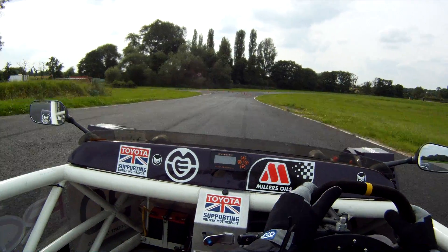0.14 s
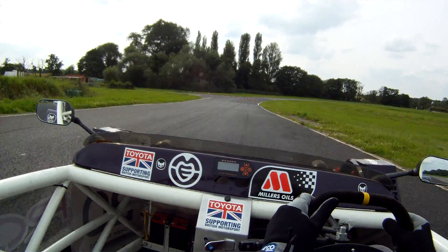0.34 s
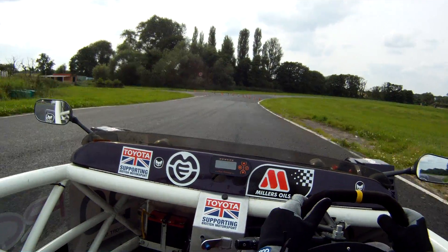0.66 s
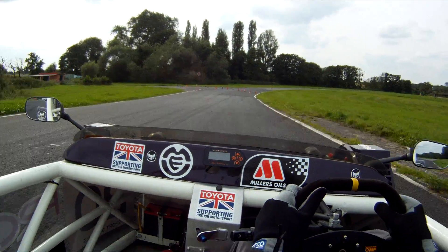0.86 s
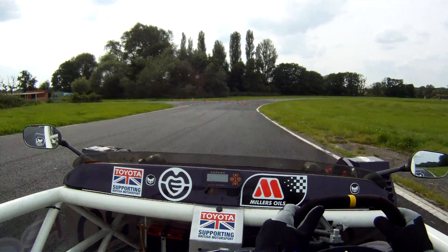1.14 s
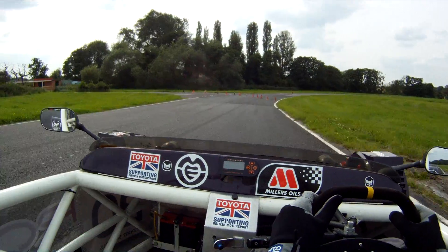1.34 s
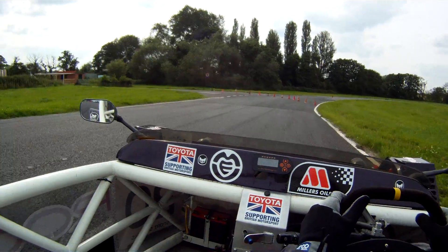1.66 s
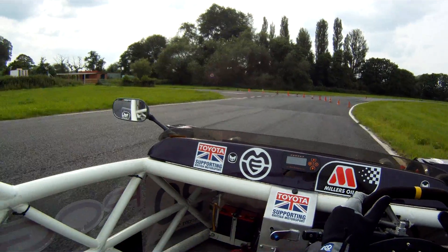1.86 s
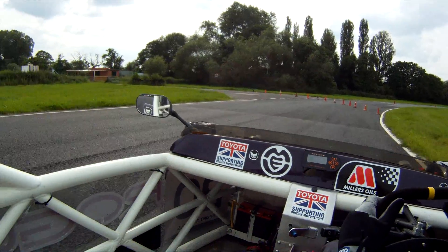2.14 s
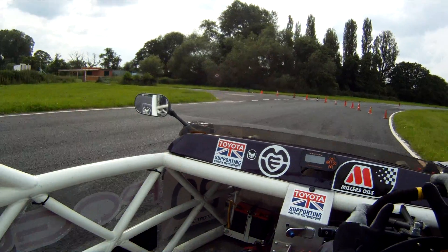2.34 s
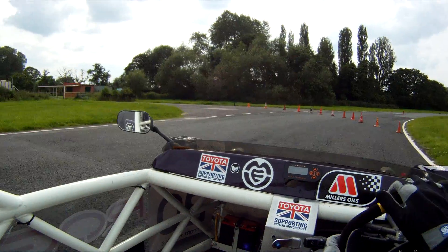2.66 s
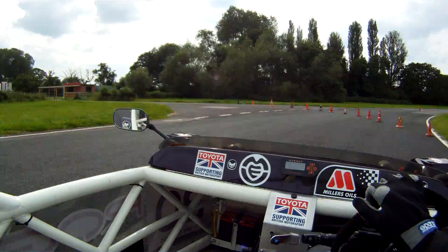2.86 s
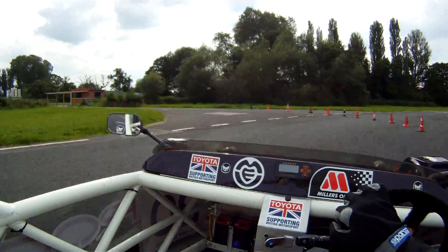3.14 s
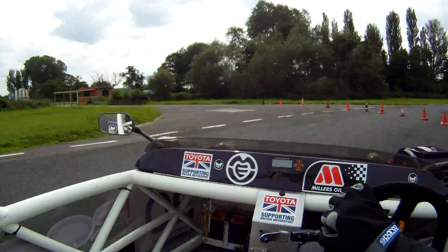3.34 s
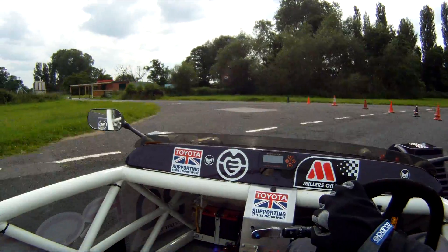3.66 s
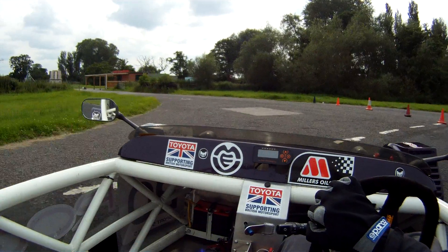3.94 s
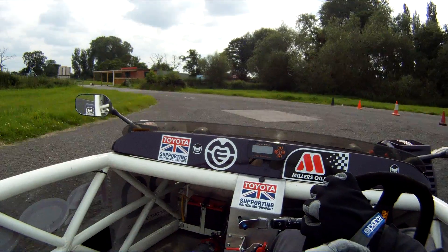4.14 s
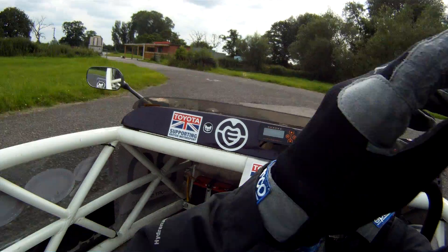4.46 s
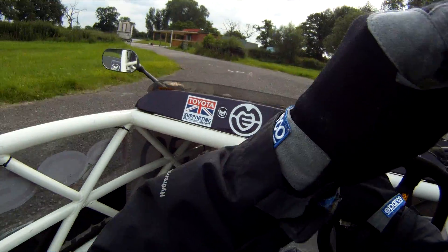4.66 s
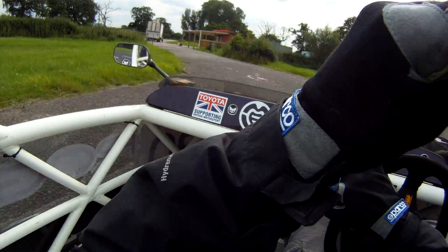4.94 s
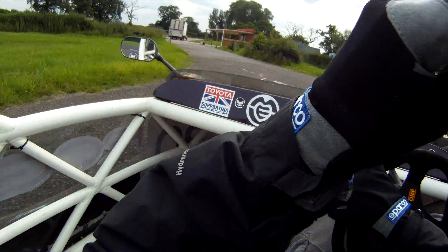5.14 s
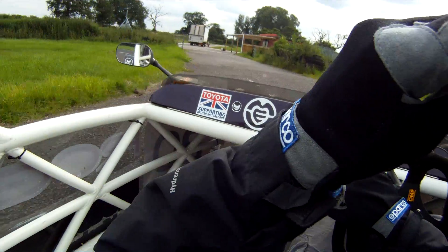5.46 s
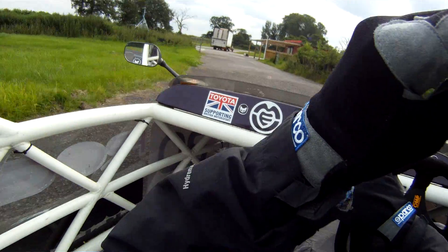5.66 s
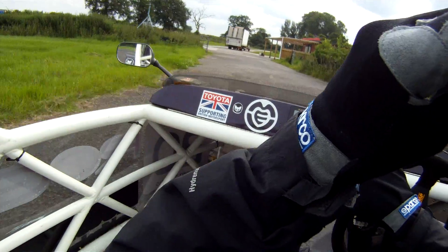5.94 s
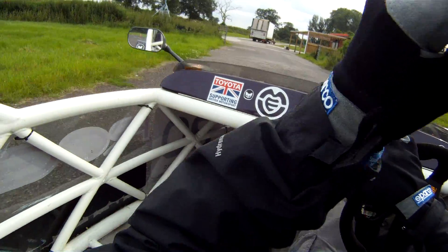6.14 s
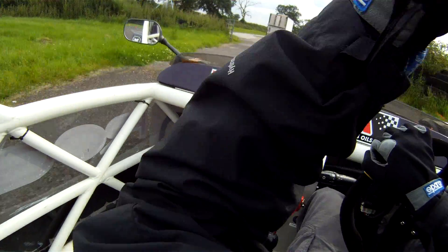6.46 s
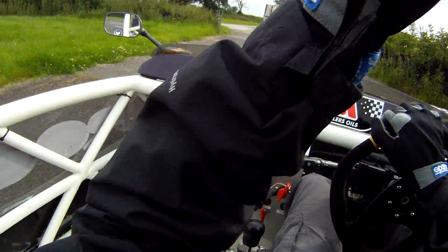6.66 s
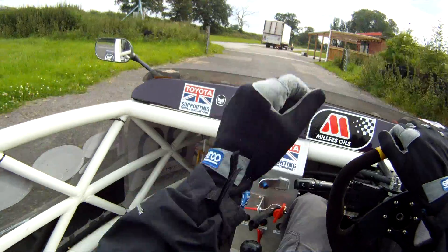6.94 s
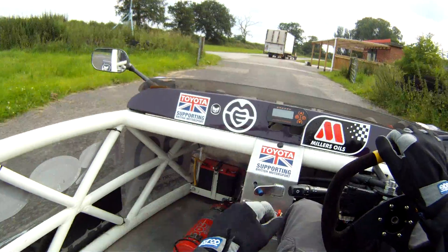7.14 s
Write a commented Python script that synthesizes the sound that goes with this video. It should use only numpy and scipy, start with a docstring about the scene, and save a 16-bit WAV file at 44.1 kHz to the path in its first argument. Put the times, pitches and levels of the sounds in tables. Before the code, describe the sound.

An open track car coasts down, its low engine hum sinking under rumble, wind and rattles, then the brakes squeal in pulses.

```python
"""An open track car coasts down from speed, heard inside a closed camera housing on its frame.
From the start, engine orders glide down through a frame resonance, the mount shakes on its modes,
tyre and wind noise fill the housing and loose parts rattle. As the rush fades, a dull thump comes
through the frame, and from about 3 s a brake squeals once a wheel turn. At 6 s one sharp tap rings
the shell; two more thumps follow, and the rush swells briefly at the end."""
import sys
import numpy as np
from scipy import signal
from scipy.fft import rfft, irfft
from scipy.io import wavfile

SR = 44100
rng = np.random.default_rng(int(sys.argv[2]) if len(sys.argv) > 2 else 0)


def pcm_store(signal):
    """Save signal as 16-bit PCM."""
    levels = np.round(np.clip(np.atleast_2d(signal), -1, 1) * 32767)
    wavfile.write(sys.argv[1], SR, levels.astype(np.int16).T)


N = 322371


def amp(db):
    """Amplitude ratio of a level in decibels."""
    return 10 ** (np.asarray(db) / 20)


def unit_rms(x):
    """Normalisation to unit power."""
    return x / np.sqrt(np.mean(x ** 2) + 1e-20)


def curves(rows):
    """Linear interpolation in time: one curve for each column after the first."""
    times, *columns = np.transpose(rows)
    return [np.interp(np.arange(N) / SR, times, column) for column in columns]


def level_at(spectrum, hz):
    """Interpolation of a spectrum on a log-frequency axis."""
    points_hz, levels_db = np.transpose(spectrum)
    return np.interp(np.log(hz), np.log(points_hz), levels_db)


def drift(rate_hz):
    """Random modulation: low-passed noise of unit rms."""
    pole = np.exp(-2 * np.pi * rate_hz * 20 / SR)   # one step every 20 samples
    white = rng.standard_normal(N // 20 + 2002)
    slow = signal.lfilter([1], [1, -2 * pole, pole * pole], white)[2000:]
    return np.interp(np.arange(N) / 20, np.arange(len(slow)), unit_rms(slow))


def ring(force, hz, t60_s):
    """Damped oscillator: a unit impulse starts a decaying sine of height 1."""
    r, w = amp(-60 / (t60_s * SR)), 2 * np.pi * hz / SR
    return signal.lfilter([0, np.sin(w)], [1, -2 * r * np.cos(w), r * r], force + 1e-18)


def sine(hz):
    """Sine of unit rms whose phase is the integral of frequency."""
    cycles = np.cumsum(hz * np.ones(N)) / SR
    return np.sqrt(2) * np.sin(2 * np.pi * (cycles + rng.random()))


def coloured(white, spectrum):
    """Spectral shaping of white noise, to unit rms."""
    hz = np.maximum(np.fft.rfftfreq(N, 1 / SR), 1)
    return unit_rms(irfft(rfft(white) * amp(level_at(spectrum, hz)), N))


def band_noise(low_hz, high_hz):
    """Band-limited noise of unit rms."""
    band = signal.butter(2, [low_hz, high_hz], "band", fs=SR, output="sos")
    return unit_rms(signal.sosfilt(band, rng.standard_normal(N)))


def driven_modes(modes):
    """Resonators under random forcing: decay time is inverse to bandwidth."""
    return sum(amp(db) * unit_rms(ring(rng.standard_normal(N), hz, np.log(1000) / (np.pi * width_hz)))
               for hz, width_hz, db in modes)


def swell_power(middles_s, lengths_s, levels_db, rise_s, fall_s):
    """Incoherent addition: plateaus with Gaussian edges sum in power."""
    t, power = np.arange(N) / SR, np.zeros(N)
    for middle, length, db in zip(middles_s, lengths_s, levels_db):
        near = slice(max(round((middle - .4) * SR), 0), round((middle + .4) * SR))
        early = np.maximum(middle - length / 2 - t[near], 0)
        late = np.maximum(t[near] - middle - length / 2, 0)
        power[near] += amp(db) ** 2 * np.exp(-2 * (early / rise_s) ** 2 - 2 * (late / fall_s) ** 2)
    return power


# Coasting engine: time_s, firing_hz, load_db, upper_orders_db
ENGINE_COAST = [(0, 112.9, -28, -12), (.5, 104, -29, -14), (1.3, 90.6, -31.5, -13), (1.8, 82, -32.5, -5.5),
                (2.2, 77.2, -35, 1), (2.6, 71.4, -36.5, 2.5), (3.1, 64, -36, -0.2), (3.8, 55, -42, -0.8),
                (4.3, 50.2, -37.5, -2.2), (4.8, 45.85, -43, -1), (5.6, 43.06, -46, 0.5),
                (6.4, 41.3, -47, 1.5), (7.31, 39.26, -51, 5)]
# Engine orders 1 to 4: gain_db
ORDER_GAINS = [3.5, 0, -4.5, 0]
# Transmission from frame to housing: frequency_hz, gain_db
FRAME_RESPONSE = [(45, -32), (60, -35), (72, -2.5), (100, 0.5), (135, -1), (160, -10.5), (172, -17),
                  (190, -19.5), (230, -37), (460, -29)]


def engine():
    """Forced vibration: each harmonic of the firing rate is loud only in the frame's pass band."""
    firing_hz, load_db, upper_db = curves(ENGINE_COAST)
    firing_hz = firing_hz * (1 + 0.0042 * drift(9.1))
    out = 0
    for k, order_db in enumerate(ORDER_GAINS):
        hz = (k + 1) * firing_hz
        drive_db = load_db + order_db + (k > 0) * upper_db
        waver_db = (0.5 + 0.92 * k) * drift(12.3)   # higher orders waver more
        out += amp(drive_db + level_at(FRAME_RESPONSE, hz) + waver_db) * sine(hz)
    return out


# Low mode of the mount: time_s, pitch_hz
MOUNT_PITCH = [(0, 35), (1.9, 35.5), (2.2, 30), (2.7, 37), (5, 37), (6.4, 36), (7.31, 40)]
# Steady shaking of that mode: time_s, level_db
MOUNT_LEVEL = [(0, -26), (.5, -28.5), (1.2, -33.5), (2, -41.5), (3, -45), (4.2, -41), (5.2, -38),
               (6.3, -40.5), (7.31, -38.5)]
# Bumps in the road: peak_s, level_db
ROAD_BUMPS = [(.19, -24), (.55, -21), (.73, -27), (.96, -27.5), (1.06, -36), (1.32, -30), (1.49, -39),
              (1.61, -28), (1.7, -31), (1.86, -35), (2.17, -36), (2.34, -38), (2.45, -35), (2.74, -36),
              (3.24, -26.5), (3.7, -39), (3.85, -35.5), (4.61, -36.5), (4.78, -33.5), (5.52, -42),
              (5.72, -29.5), (6.16, -35.5), (6.48, -24), (6.72, -42), (6.96, -35), (7.1, -30), (7.2, -32)]


def mount_shake(jolts):
    """Base excitation: the mount swings unevenly on its low mode, and each bump swells the motion."""
    pitch_hz, steady_db = curves(MOUNT_PITCH)[0], curves(MOUNT_LEVEL)[0]
    swing = amp(drift(17)) * sine(pitch_hz * (1 + 0.072 * drift(7)))
    peak_s, bump_db = np.transpose(ROAD_BUMPS)
    bumps = swell_power(peak_s, np.zeros_like(peak_s), bump_db, rise_s=0.053, fall_s=0.043)
    envelope = np.sqrt(amp(steady_db + 1.5 * drift(5.3)) ** 2 + bumps)
    return envelope * (swing + .35 * jolts)


# Road vibration at the mount: time_s, level_db
ROAD_DRIVE = [(0, -31.5), (1, -31.5), (1.7, -41), (2.5, -39), (3.5, -42), (5, -49), (6.5, -48), (7.31, -55)]
# Higher modes of the mount: pitch_hz, bandwidth_hz, gain_db
MOUNT_MODES = [(78.6, 23, 3), (139, 39, -11.5)]


def road_hum(jolts):
    """Random excitation: the road keeps the mount's higher modes humming over a low rumble."""
    rumble = amp(-9.5) * np.roll(jolts, N // 2)   # the shift decorrelates it from the shake
    return amp(curves(ROAD_DRIVE)[0]) * (driven_modes(MOUNT_MODES) + rumble)


# Roar of the tyres: time_s, level_db
TYRE_LEVEL = [(0, -34), (.45, -43), (.56, -36), (.65, -40.5), (1.43, -43.5), (2, -49), (2.5, -49.5),
              (2.66, -45.5), (3.94, -53), (4.47, -42.5), (4.9, -45), (5.3, -51), (5.97, -48), (6.25, -47),
              (6.44, -43.5), (6.54, -51.5), (7, -49), (7.31, -44.5)]
# Its spectrum: frequency_hz, relative_density_db
TYRE_SPECTRUM = [(90, -33), (150, 1.5), (230, -0.5), (300, -1.5), (420, -3.5), (520, -3.5), (800, -29)]


def tyres():
    """Rolling contact: tyres on the surface make a dull, slightly lumpy noise."""
    envelope = amp(curves(TYRE_LEVEL)[0] + drift(21))
    return envelope * coloured(rng.standard_normal(N), TYRE_SPECTRUM)


# Wind in the housing, falling with speed: time_s, low_db, bright_db
WIND_LEVELS = [(0, -27.5, -25), (.2, -32.5, -34.5), (.7, -33.5, -32.5), (.8, -37.5, -37), (.97, -35, -33.5),
               (1.55, -38, -40), (1.8, -42, -41), (2.3, -46.5, -46.5), (2.8, -45, -44), (3.4, -47.5, -44),
               (3.65, -49.5, -48.5), (4.27, -46.5, -45), (4.7, -47.5, -43), (5.6, -52, -52),
               (6.0, -47, -43), (6.5, -51, -50), (6.93, -45.5, -43), (7.13, -47.5, -45), (7.31, -41.5, -34)]
# Rustles, short swells of the wind: middle_s, length_s, low_db, bright_db
WIND_RUSTLES = [(.15, 0.076, -39, -34), (1.558, 0.01, -38.5, -39), (1.647, 0.0073, -51, -50),
                (2.305, 0.027, -42.5, -42.5), (2.406, 0.02, -59, -43.5), (2.498, 0.014, -56, -48),
                (3.432, 0.023, -47, -60), (4.512, 0.28, -45, -39.5), (4.727, 0.037, -48.5, -55),
                (4.894, 0.12, -43.5, -42.5), (5.1, 0.045, -47, -42.5), (5.22, 0.036, -49.5, -44.5),
                (5.326, .03, -52, -43), (5.45, .15, -48.5, -47.5), (6.084, .05, -41.5, -36.5),
                (6.16, .03, -43, -37.5), (6.27, 0.097, -40.5, -43), (6.36, 0.066, -44.5, -52),
                (6.39, 0.036, -36, -40), (6.424, 0.0099, -32, -46), (7.254, .08, -43.5, -46)]
# Spectra of the low range and of the bright range, fast and slow: frequency_hz, relative_density_db
LOW_SPECTRUM = [(300, -32), (480, -15), (610, -7), (700, -7), (770, -4.5), (860, -6), (925, -1), (990, -11),
                (1080, -15), (1500, -16.5), (1950, -16.5), (3300, -68)]
FAST_SPECTRUM = [(650, -55), (1100, -32), (1210, -9), (1880, -10.5), (2380, 2), (2490, 0), (3050, -2),
                 (3320, -14.5), (3710, -6.5), (4150, -21), (5200, -19), (5900, -46), (7670, -67),
                 (13000, -120)]
SLOW_SPECTRUM = [(900, -40), (1100, -21), (1220, -6.5), (1340, -21.5), (1640, -11), (1900, -23.5),
                 (2110, -6), (2210, -1), (2380, 1), (2430, -13.5), (2540, -6.5), (2620, -6), (2800, -10),
                 (3290, -17.5), (3700, -16.5), (4200, -20), (5300, -22), (5900, -42), (7670, -67)]
# Crossfade to the slow spectrum: time_s, power_fraction
SLOW_SHARE = [(0, 0.04), (1.8, 0.45), (3, 0.9), (4, 1), (7.31, 1)]


def wind():
    """Flow noise filtered by housing resonances: two ranges share gusts, and each also flutters alone."""
    middle_s, length_s, *rustle_db = np.transpose(WIND_RUSTLES)
    rustles = [swell_power(middle_s, length_s, db, rise_s=0.018, fall_s=0.019) for db in rustle_db]
    buffet_db = 0.82 * drift(15.4)
    low_gain, bright_gain = [np.sqrt(amp(steady_db + buffet_db) ** 2 + power)
                             for steady_db, power in zip(curves(WIND_LEVELS), rustles)]
    gust = drift(50)
    low_gain *= amp(1.3 * gust + drift(65))
    bright_gain *= amp(1.74 * gust + 0.72 * drift(130))
    low = coloured(rng.standard_normal(N), LOW_SPECTRUM)
    white = rng.standard_normal(N)
    share = np.clip(curves(SLOW_SHARE)[0], 0, 1)
    fast = np.sqrt(1 - share) * coloured(white, FAST_SPECTRUM)
    slow = np.sqrt(share) * coloured(white[::-1], SLOW_SPECTRUM)
    return low_gain * low + bright_gain * (fast + slow)


# Knocks of loose parts: start_s, body_db, crackle_db
RATTLE_HITS = [(0.0675, -24, -39), (0.088, -16, -37), (0.131, -19, -40), (0.142, -21, -42),
               (0.2353, -17, -41), (0.284, -16, -36), (0.3257, -18.5, -42), (0.366, -18.5, -41),
               (0.4804, -31, -38), (0.556, -17.5, -41), (0.9014, -27, -46), (0.934, -26, -42),
               (1.011, -26, -53), (1.1278, -19, -43), (1.435, -22.5, -48), (1.6445, -23.5, -54),
               (1.929, -25, -57), (2.058, -27.5, -52), (2.32, -35, -54), (2.5995, -38, -52),
               (3.3184, -34, -48), (3.5794, -43, -40), (3.8776, -30, -52), (4.122, -28, -42),
               (4.358, -32, -46), (4.449, -32, -38), (4.5145, -28, -34), (4.58, -37, -42),
               (4.635, -32, -44), (4.7103, -33, -46), (4.7624, -38, -45), (5.5862, -46, -50),
               (5.7897, -32, -46), (6.0611, -28, -39), (6.1529, -28.5, -53), (6.2123, -36, -43),
               (6.278, -30, -44), (6.513, -37, -42), (6.5645, -33.5, -41.5), (6.7435, -31.5, -50),
               (6.8875, -33, -43), (6.98, -29, -38)]
# Response of the housing body: frequency_hz, relative_density_db
BODY_SPECTRUM = [(500, -20), (900, -15), (1100, -18), (1600, -3.5), (2400, 7), (3000, 6.5), (3400, -7),
                 (4500, -20), (9000, -60)]


def rattles(body_t60_s=.046, body_rise_s=0.0027, crackle_rise_s=.002):
    """Impact noise with exponential decay: the body dies quickly, the thin crackle lasts longer."""
    t = np.arange(SR // 5) / SR
    decay = amp(-60 * t / body_t60_s)
    body, crackle = np.zeros((2, N + SR))
    for start_s, body_db, crackle_db in RATTLE_HITS:
        start = round(start_s * SR)
        burst = slice(start, start + len(t))
        body[burst] += amp(body_db) * decay * (1 - np.exp(-t / body_rise_s))
        crackle[burst] += amp(crackle_db) * decay ** 0.61 * (1 - np.exp(-t / crackle_rise_s))
    thin = band_noise(3200, 5500)
    return body[:N] * coloured(rng.standard_normal(N), BODY_SPECTRUM) + crackle[:N] * thin


# Thumps through the frame: start_s, level_db, pitch_hz, t60_s
FRAME_THUMPS = [(2.656, -20, 79, 0.24), (6.016, -23.5, 64.2, 0.37), (6.421, -18, 67.4, 0.1)]


def thumps():
    """Impulse response: each thump leaves the mount ringing at one low pitch."""
    return sum(ring(amp(db) * signal.unit_impulse(N, round(start_s * SR)), hz, t60_s)
               for start_s, db, hz, t60_s in FRAME_THUMPS)


# Effect of pedal pressure: time_s, unbroken_squeal_db, weak_modes_db, hiss_db, whistle_db
BRAKE_LEVELS = [(2.75, -57, -6, -60, -80), (2.95, -56, 2, -49, -67), (3.55, -56, -7, -49, -66),
                (3.65, -54, 0, -46, -59.5), (4.4, -58, 3.5, -51.5, -61), (4.7, -56, -8, -50, -65),
                (5.2, -54, -4, -52, -65.5), (5.5, -52, -9, -49.5, -64), (6, -57, -2, -52, -71),
                (7.31, -64, -2, -47, -71)]
# Bites of the pad: middle_s, length_s, level_db
PAD_BITES = [(2.907, 0.063, -44), (3.013, 0.017, -41.5), (3.12, 0.13, -42), (3.293, 0.061, -39),
             (3.42, 0.09, -41.5), (3.5, .05, -47.5), (3.573, .055, -41.5), (3.67, 0.041, -41),
             (3.775, .065, -42.5), (3.898, 0.066, -48), (4, 0.038, -47), (4.125, .06, -43.5),
             (4.251, 0.077, -45.5), (4.362, 0.0076, -42), (4.43, .07, -46), (4.567, 0.078, -40.5),
             (4.727, 0.024, -40.5), (4.84, 0.071, -39.5), (4.939, 0.049, -38.5), (5.047, 0.061, -42.5),
             (5.19, 0.15, -45.5), (5.387, .045, -43.5), (5.497, .05, -39.5), (5.617, 0.044, -36),
             (5.728, .055, -39.5), (5.848, .05, -39.5), (5.96, .06, -46), (6.103, .05, -37.5),
             (6.275, .02, -42), (6.572, .015, -46.5), (6.693, 0.0095, -45.5), (6.808, 0.029, -43),
             (6.912, 0.045, -37), (7.005, 0.022, -46), (7.083, 0.034, -46), (7.196, 0.028, -47),
             (7.28, .03, -39)]
# Weaker modes of the disc: pitch_hz, bandwidth_hz, gain_db
DISC_MODES = [(1658, 24, -18.5), (2045, 25, -14), (2230, 27, -13), (2310, 80, -12.5), (2590, 29, -19),
              (3776, 31, -15.5)]


def brake_squeal(squeal_hz=2179.5, whistle_hz=5453, edge_s=0.0099):
    """Friction-induced vibration: each bite swells the disc modes; hiss and whistle last with contact."""
    steady_db, weak_db, hiss_db, whistle_db = curves(BRAKE_LEVELS)
    middle_s, length_s, bite_db = np.transpose(PAD_BITES)
    bite = np.sqrt(amp(steady_db) ** 2 + swell_power(middle_s, length_s, bite_db, edge_s, edge_s))
    contact_power = swell_power(middle_s, length_s, np.zeros_like(bite_db), edge_s, edge_s)
    contact = np.sqrt(np.minimum(contact_power, 1))
    flicker_db = .8 * drift(15) + 1.7 * drift(120)
    singing = amp(flicker_db) * sine(squeal_hz * (1 + .0015 * drift(8)))
    ringing = amp(weak_db) * driven_modes(DISC_MODES)
    hiss = amp(hiss_db) * coloured(rng.standard_normal(N), SLOW_SPECTRUM)
    whistle = amp(whistle_db + 3.2 * drift(25)) * sine(whistle_hz * (1 + 0.00127 * drift(13)))
    return bite * (singing + ringing) + contact * (hiss + whistle)


# Modes of the housing shell: pitch_hz, gain_db, t60_s
SHELL_MODES = [(1980, 11.5, 0.0063), (2170, 1.5, 0.014), (1670, -7, 0.013), (1500, -5.5, 0.014),
               (1230, -4.5, 0.022), (1120, -25, 0.012), (906, -9.5, 0.024), (830, -22, 0.027),
               (580, -22, 0.044), (324, -26.5, .05), (2760, -17, 0.024), (5500, -20, 0.0044)]


def shell_tap(start_s=6.0079, drive_db=-4.5, push_delay_s=.00026):
    """Modal superposition: a light touch, then a push of opposite sign, sets the shell ringing."""
    impulse = amp(drive_db) * signal.unit_impulse(N, round(start_s * SR))
    push = np.roll(impulse, round(push_delay_s * SR))
    contact_pulse = np.hanning(22) / 6   # half a millisecond of contact softens the treble
    force = signal.lfilter(contact_pulse, [1], push - .3 * impulse)
    return sum(amp(db) * ring(force, hz, t60_s) for hz, db, t60_s in SHELL_MODES)


def scene():
    """Linear superposition: all sources reach one microphone through the housing."""
    jolts = band_noise(18, 56)
    rolling = engine() + mount_shake(jolts) + road_hum(jolts) + tyres() + wind()
    return (rolling + rattles() + thumps() + brake_squeal() + shell_tap())[None]


def record(dry, clip_level=.84, cutoff_hz=15270):
    """Zero-order hold: clipped 12 kHz samples form mirror bands about 12 kHz; a low-pass cuts the top."""
    coarse = signal.resample_poly(dry, 40, 147, axis=1)   # 12 kHz
    clipped = np.clip(coarse, -clip_level, clip_level)
    held = np.repeat(clipped, 4, axis=1)   # 48 kHz
    restored = signal.resample_poly(held, 147, 160, axis=1)[:, :N]
    low_pass = signal.ellip(12, .3, 80, cutoff_hz, fs=SR, output="sos")
    return signal.sosfilt(low_pass, restored)


dry = scene()
out = record(dry)
pcm_store(out)
```